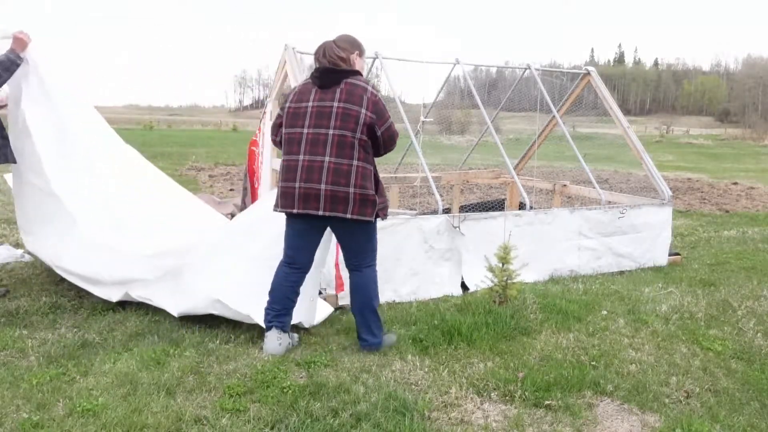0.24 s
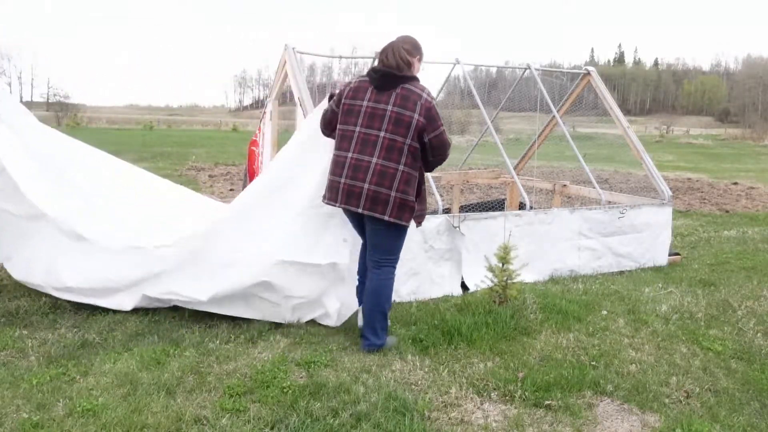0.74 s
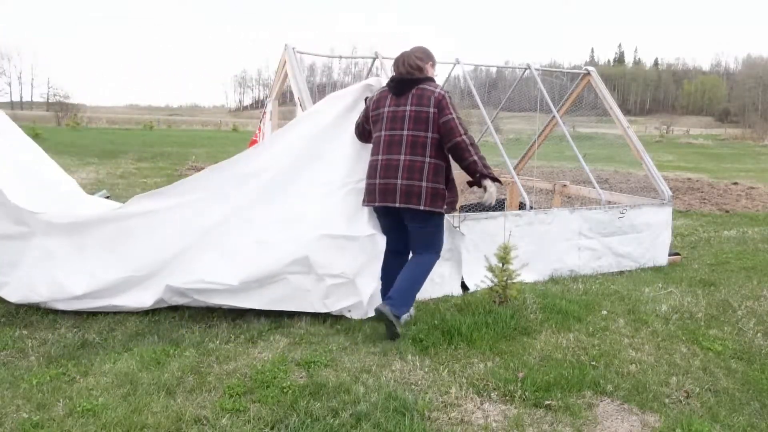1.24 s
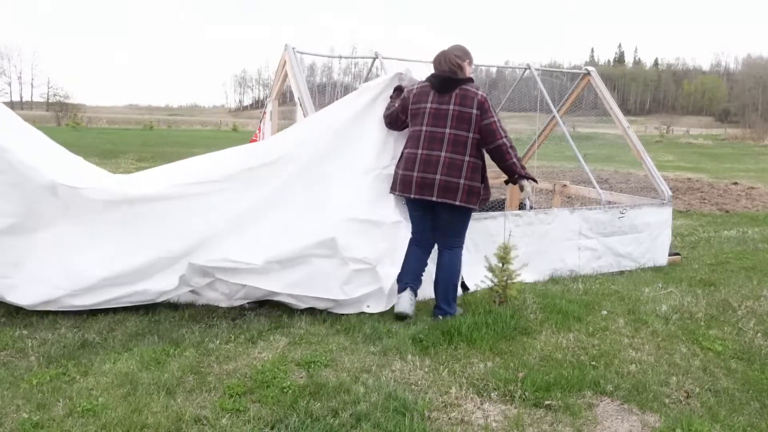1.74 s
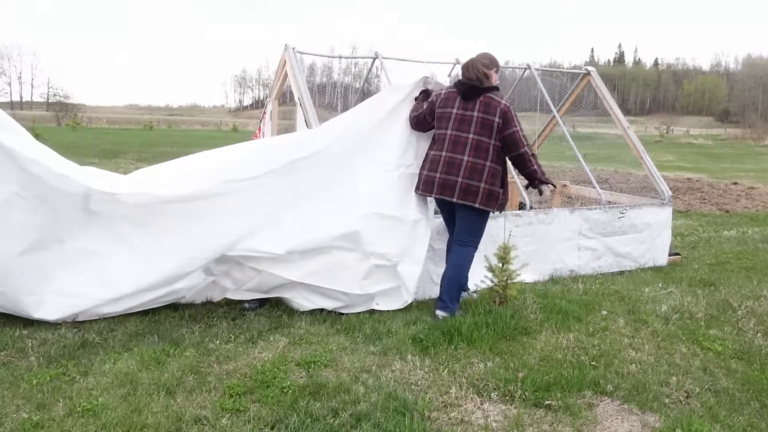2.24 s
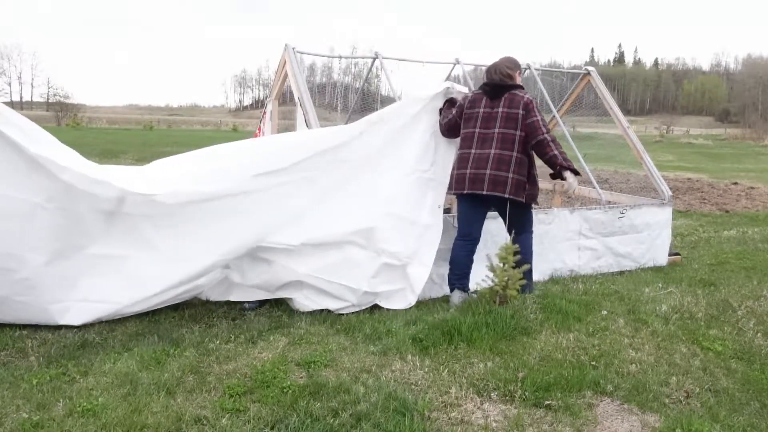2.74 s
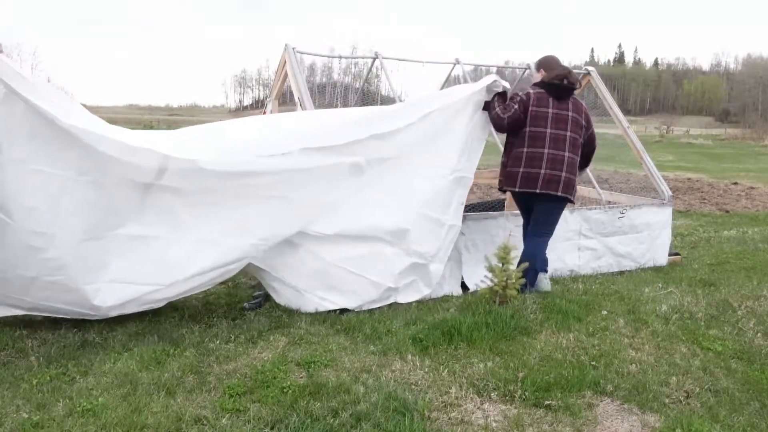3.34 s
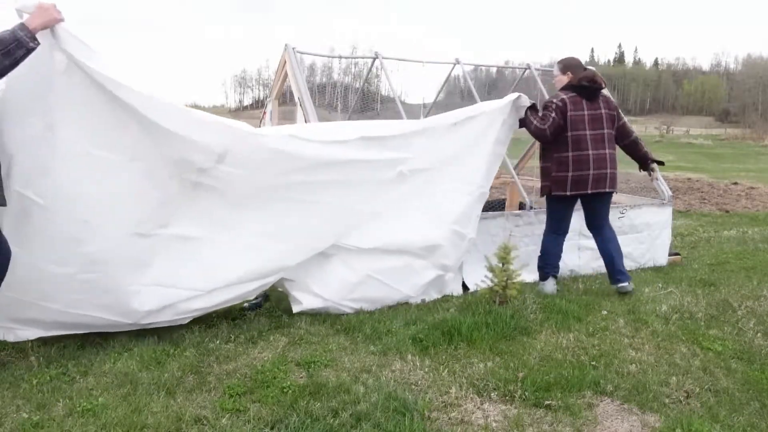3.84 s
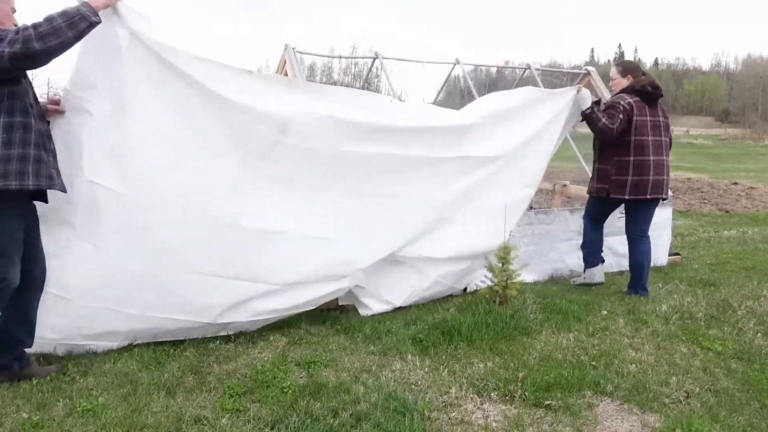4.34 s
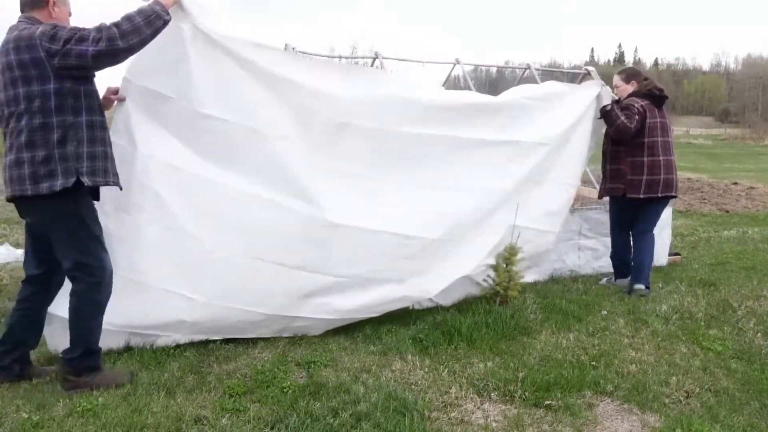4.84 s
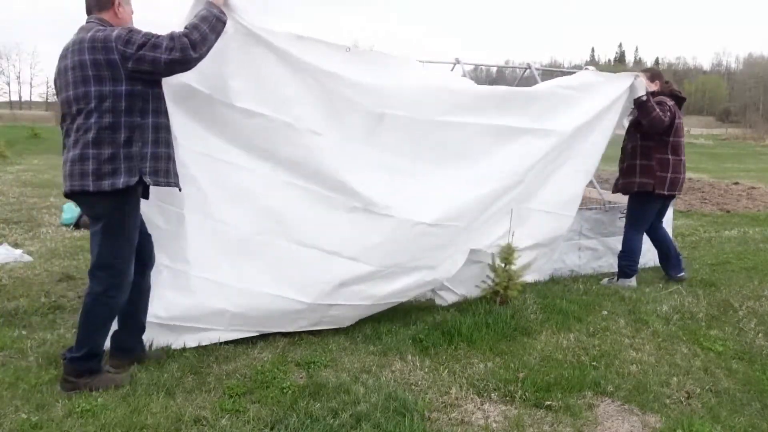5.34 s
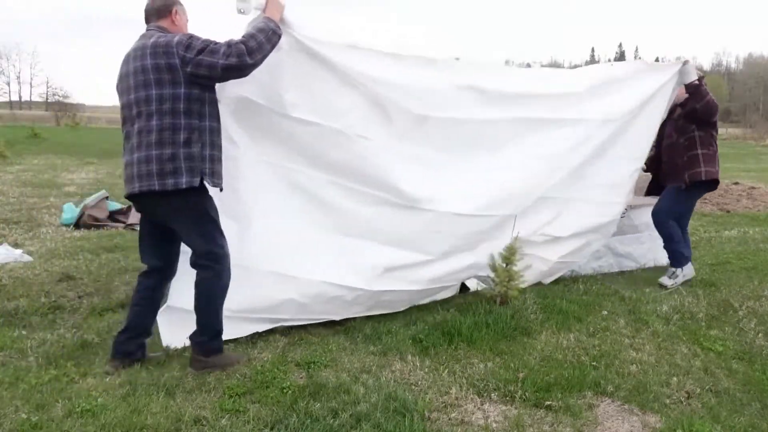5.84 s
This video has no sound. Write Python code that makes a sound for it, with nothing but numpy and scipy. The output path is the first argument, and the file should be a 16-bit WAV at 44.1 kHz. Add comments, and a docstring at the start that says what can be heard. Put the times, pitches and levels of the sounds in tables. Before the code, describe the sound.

A large plastic tarp rustles, snaps and crinkles in uneven swells as it is hauled across grass and a frame outdoors.

```python
"""Open field, a few metres from a camera: two people pull a large plastic tarp over a greenhouse frame.
A hard tug opens with a rush of snaps; lighter handling follows, then new flurries near 1.2 s and from 2.3 s.
After a lull past 3.3 s the pulls are hardest from 4.3 to 5.4 s, then they thin out to the end.
Throughout, folds rumble as soft noisy grains, creases crinkle in swarms of short filtered noise bursts,
and the sliding sheet hisses as shaped noise with ticks; the noise drifts from slightly left to slightly right."""
import sys
import numpy as np
from scipy import signal
from scipy.fft import rfft, irfft, next_fast_len
from scipy.io import wavfile
from scipy.ndimage import uniform_filter1d, map_coordinates

SR = 44100
rng = np.random.default_rng(int(sys.argv[2]) if len(sys.argv) > 2 else 0)


def wrap_up_sound(samples):
    """Save the sound to the file named by the first command line argument, as 16-bit audio."""
    columns = np.atleast_2d(samples).T
    # keep every value between -1 and 1, then stretch to whole-number steps
    tamed = np.clip(columns, -1, 1)
    steps = np.round(tamed * 32767).astype(np.int16)
    wavfile.write(sys.argv[1], SR, steps)


N = 268561  # length in samples, about 6.1 s

# big creases popping through: start_s [s], energy_db [dB], centre_hz [Hz], tail_db [dB against the front]
BIG_SNAPS = [(0.002, 0, 1450, 15), (0.027, 0, 1795, 18), (0.0301, -1, 4530, 6.5), (0.042, -5, 2780, 9),
             (0.0527, -2, 1695, 4), (0.066, 0.5, 1966, 1.5), (0.103, -6, 3728, -3), (0.151, -2.5, 1783, 8),
             (0.2222, -3.5, 5370, 0), (0.3623, -4, 2700, -4), (0.3867, -8.5, 2470, 7),
             (0.4076, -8, 4300, -2.5), (0.4569, -8.5, 1650, 4.5), (0.5694, -7.5, 1940, 5),
             (0.5813, -8, 2720, 2), (0.6627, -7.5, 3760, -1.5), (0.6848, -1, 3170, -2),
             (0.823, -6, 620, -19), (0.946, -4, 2110, 8), (1.016, -6, 1000, -3), (1.036, -3, 2300, 11),
             (1.1386, 0, 2590, 13), (1.1757, -2.5, 1830, 3), (1.2037, -5, 3000, 0), (1.2415, -3, 1850, 7),
             (1.261, -3, 2620, 7), (1.2895, -5.5, 3750, 4), (1.29, 0.5, 890, -6), (1.335, -3, 2150, 5),
             (1.3981, -1.5, 1450, 1), (1.398, -3, 4400, -4), (1.434, -10, 3260, -5), (1.461, -5, 1740, 6),
             (1.5614, -10.5, 4160, 4), (1.6076, -6, 1530, 1), (1.677, -3.5, 1900, -20),
             (1.776, -5.5, 3000, 13), (1.892, -4, 2780, 20), (1.9272, -8, 3460, 0), (1.947, -6, 1860, -2),
             (1.9978, -8.5, 1950, 15), (2.038, -9.5, 2520, 0), (2.1833, -2, 1900, 0), (2.187, -3, 2620, 3),
             (2.199, -5, 2170, 13), (2.2281, -8, 1450, 13), (2.3047, -6.5, 2520, 14),
             (2.3219, -5.5, 1370, -14), (2.3284, -2, 2000, 9), (2.3494, 3, 1400, 4.5), (2.4893, 2, 1590, 4),
             (2.5, -3, 2200, 12), (2.54, -7, 4600, 19), (2.557, -3.5, 1750, 5), (2.5823, -4, 2350, 13),
             (2.633, -4.5, 3100, 20), (2.663, -2, 970, 3), (2.6889, -2.5, 2800, 4), (2.693, -2, 3180, 11),
             (2.7274, 3, 1930, 7.5), (2.75, -3.5, 1600, 11), (2.759, -3.5, 1800, 9), (2.804, -6.5, 4060, 5),
             (2.822, -2, 2300, 23), (2.848, -0.5, 2900, 6), (2.9437, -5.5, 3400, 14),
             (3.002, -5.5, 1660, 7), (3.1057, -3, 2060, 6), (3.13, -1.5, 5300, -11), (3.141, 1, 1400, 4),
             (3.1843, -1.5, 2840, 3), (3.212, -3, 2700, 12), (3.2246, -3, 1740, 7), (3.2921, -6, 1730, 9),
             (3.3639, -7.5, 1500, 6), (3.4399, -11.5, 2300, 19), (3.5472, -8.5, 3160, 5),
             (3.655, -6.5, 2160, 3), (3.6949, -7, 2880, 4), (3.7384, -7.5, 1820, 3),
             (3.8375, -3.5, 1500, 2), (3.8848, 2.5, 3340, -7), (3.9153, -7.5, 1590, 6),
             (4.1088, -4.5, 1810, 11), (4.132, -4, 1640, -1), (4.1945, -3, 2750, 4), (4.25, -3.5, 2370, 1),
             (4.2782, -1.5, 1650, -3), (4.3079, -5.5, 4210, 11), (4.4246, 1.5, 1700, 2.5),
             (4.4845, 5, 2400, 11), (4.5012, -2.5, 756, -15), (4.5358, 0.5, 4600, 4), (4.588, -2, 3500, -1),
             (4.6241, -2.5, 1670, 0), (4.718, -0.5, 4200, -2), (4.826, 0.5, 2720, -2),
             (4.832, -2.5, 2280, 14), (4.845, 3.5, 2500, 6), (4.8611, -3.5, 3320, 6),
             (4.8864, -1.5, 4400, 7), (4.9096, -3.5, 1780, 11), (4.951, -3, 2190, 1), (5.023, 0.5, 3080, 6),
             (5.04, -2, 2060, 14), (5.1083, -3.5, 2000, 0), (5.263, -4, 2620, 4.5),
             (5.2999, -2.5, 2550, 0.5), (5.3206, -3.5, 1710, 9), (5.354, -5, 3295, 6), (5.374, 0, 2520, -4),
             (5.4997, 0, 2010, -13.5), (5.5168, -5.5, 1630, 3.5), (5.5845, -5.5, 2620, 1),
             (5.6294, -6, 1080, -1.5), (5.6404, -8, 2900, -7), (5.7864, -3, 3830, 9), (5.831, -8, 2350, 4),
             (5.8851, -6.5, 2130, 4), (6.022, -4.5, 2658, -0.5)]
# colour of flexing folds, small creases and sliding weave: pitch_hz [Hz], relative level_db [dB per Hz]
FOLD_COLOUR = [(20, -46), (70, -56), (120, -30), (250, -16), (400, -9), (600, -0.5), (900, 1.5),
               (1400, -0.5), (2500, -4), (6000, -34)]
CREASE_COLOUR = [(100, -27), (400, -23), (900, -0.5), (1500, -0.5), (2200, -5), (3200, -3.5), (5000, -6.5),
                 (8000, -15.5), (12000, -29), (16000, -60)]
SLIDE_COLOUR = [(300, -33.5), (1500, -4), (4000, -2), (7000, -6.5), (10000, -16), (13000, -22.5),
                (16000, -41)]
# width of the sheet between the microphone ports: pitch_hz [Hz], side_db [dB against mid]
PORT_WIDTH = [(100, -15), (500, -19.5), (2000, -19), (4000, -16), (8000, -13), (13000, -10.5)]
# balance of the sheet across the ports: time_s [s], left_minus_right_db [dB]
SHEET_PLACE = [(0, .9), (1.3, .5), (2.2, 0), (4.2, -.2), (5.2, -1.1), (6.1, -1.5)]
# pulls on the sheet, before the gains below: peak_s [s], length_s [s], crinkle_db [dB],
# fold_db [dB against the crinkling]
SHEET_PULLS = [(.015, .11, -27, -8.5), (.155, .05, -35, -6), (.25, .14, -44.5, -1), (.51, .07, -45, -3),
               (.625, .07, -37.5, -7), (0.791, .17, -34.5, -6), (1.161, .22, -33, -5),
               (1.33, .08, -41, 0.5), (1.68, .32, -43.5, -1), (1.961, .16, -44.5, 0), (2.14, .09, -54, 7),
               (2.338, .04, -34.5, -8), (2.42, .08, -41.5, -1), (2.531, .1, -35, -6),
               (2.66, .08, -36, -4.5), (2.779, .1, -38, -3), (2.965, .14, -38.5, -3.5),
               (3.135, .07, -37.5, -7), (3.215, .09, -32.5, -6.5), (3.8, .24, -44.5, -4),
               (4.11, .13, -42, -4), (4.339, .22, -32, -8), (4.511, .08, -38, 1), (4.715, .16, -30.5, -5),
               (4.879, .11, -32, -5), (5.101, .22, -34.5, -7.5), (5.305, .11, -30.5, -10),
               (5.48, .25, -36.5, -6), (6.02, .35, -39, -8)]
# stretches of sliding, before the gain in slide(): start_s [s], end_s [s], hiss_db [dB]
SHEET_DRAGS = [(0.01, 0.038, -52), (0.153, 0.175, -44.5), (0.687, 1.57, -52), (1.878, 2.018, -56),
               (2.474, 2.721, -51.5), (2.713, 3.718, -55.5), (2.893, 2.963, -51.5), (3.738, 4.919, -50.5),
               (4.29, 4.479, -51), (5.185, 6.116, -50), (5.28, 5.341, -44.5), (5.787, 5.831, -45.5)]

TOP_HZ = 15800  # band limit of the camera
REST_CRINKLE_DB, REST_FOLD_DB = -44.5, -49.5  # the hanging sheet never lies quite still; before the gains
FOLD_GAIN_DB, CRINKLE_GAIN_DB = 4.5, -0.63  # how strongly each radiates
DRAG_EDGE_S, REST_SLIDE_DB = .02, -57  # time to start or stop sliding; hem brushing the grass, before gain
RING_Q, RING_LOSS = 2.2, 0.79  # sharpness of a crease's ring; dB of Q lost per dB scattered into the tail
AFTERMATH_DB, AFTERMATH_S = -41, .013  # crinkle power set off by a 0 dB snap; time for it to fall to 1/e
BILLOW_HZ, BILLOW_GROWS = 400, 0.13  # wide folds sound below this; extra dB there per dB of harder pulling
PANEL_HZ, PANEL_Q, PANEL_DB = 1000, 0.87, -3  # sheet around a big crease: pitch, sharpness, level against it


def snaps():
    """Big creases pop through as the sheet is tugged: taut ones ring, crumpled ones scatter into a tail."""
    start_s, energy_db, centre_hz, tail_db = np.transpose(BIG_SNAPS)
    q = RING_Q * amp(-RING_LOSS * tail_db)
    rows = buckles(centre_hz, tail_db, q, t60=.028, late_db=-19, late_t60=.07,
                   edge_hz=7400, low_hz=420, size=2048, panel_gain=amp(PANEL_DB))
    return placed(np.round(start_s * SR), rows * amp(energy_db)[:, None])


def buckles(centre_hz, tail_db, q, t60, late_db, late_t60, edge_hz, low_hz, size, panel_gain=0):
    """One row per crease: a sharp front, then bending waves that scatter through the sheet."""
    t = np.arange(size) / SR
    hz = np.fft.rfftfreq(size, 1 / SR)
    # small facets ring higher, taut ones longer
    s = 1j * hz / centre_hz[:, None]
    facet = s / (1 + s / np.maximum(q, .5)[:, None] + s * s)
    # the sheet around the crease recoils the other way
    p = 1j * hz / PANEL_HZ
    panel = panel_gain * p / (1 + p / PANEL_Q + p * p)
    # the flip takes a finite time
    edge = 1j * hz / edge_hz
    flip = 1 / (1 + np.sqrt(2) * edge + edge * edge) ** 2
    # a thin sheet radiates little bass
    low = 1j * hz / low_hz
    radiated = (facet - panel) * flip * low / (1 + low)

    # the crease gives way in a rush of tiny pops
    shape = (len(centre_hz), size)
    pops = .22 * rng.standard_normal(shape) * amp(-60 * t / .004)
    pops = pops + (t == 0)
    front = unit_energy(irfft(rfft(pops) * radiated, size))
    # the scattered waves die in an early and a late decay
    fade = amp(-60 * t / t60) + amp(late_db - 60 * t / late_t60)
    waves = rng.standard_normal(shape) * fade
    tail = unit_energy(irfft(rfft(waves) * radiated, size))
    return unit_energy(front + amp(tail_db)[:, None] * tail)


def crinkles(level_db, burst_db):
    """Small creases buckle in clumps, over a rustle of ones too fine to tell apart."""
    ticks = swarm(level_db, centre_hz=2800, scatter=1.0, spread_db=13.5, tail_db=1,
                  edge_hz=10000, count=1800)
    rustle = coloured(rng.standard_normal(N), CREASE_COLOUR)
    grain = coloured(ticks, CREASE_COLOUR) + amp(-10) * rustle
    return amp(level_db + 0.47 + burst_db) * unit(grain)


def swarm(level_db, centre_hz, scatter, spread_db, tail_db, edge_hz, count):
    """Many small buckles of unequal size, denser where the sheet moves more; rms 1."""
    density = unit(amp(level_db / 2))
    when, pitch, size, taut, blur = rng.random((count, 5)).T
    # jittered turns, spread through time in proportion to the density
    turns = (np.arange(count) + 2 * when) / (count + 2)
    starts = np.searchsorted(np.cumsum(density) / density.sum(), turns)
    hz = centre_hz * np.exp(scatter * (2 * pitch - 1))
    tails = tail_db + 10 * (blur - .5)
    q = 0.66 + 4 * taut ** 2
    rows = buckles(hz, tails, q, t60=.02, late_db=-26, late_t60=.05,
                   edge_hz=edge_hz, low_hz=400, size=640)
    sizes = amp(spread_db * size ** 2)  # most are tiny; a few stand out
    track = placed(starts, rows * sizes[:, None])
    return unit(track / np.sqrt(density))  # evens out the level; the caller sets it


def avalanches(rate, life, depth_db):
    """One crease sets off its neighbours: quick rises of activity that die away, in dB about zero."""
    chance, size = rng.random((2, N))
    kicks = (chance < rate / SR) * (1 + 2 * size)
    activity = dying(kicks, life)
    swell = np.tanh(activity / 3)  # only so many creases are ready to go
    for _ in range(2):
        swell = uniform_filter1d(swell, size=48)  # it takes a moment to spread
    return depth_db * unit(swell - swell.mean())


def aftermath():
    """Power of the crinkling that follows each big snap as the creases around it settle."""
    start_s, energy_db, _, _ = np.transpose(BIG_SNAPS)
    power = amp(energy_db + AFTERMATH_DB) ** 2
    kicks = np.bincount(np.round(start_s * SR).astype(int), power, N)
    return dying(kicks, AFTERMATH_S)


def pulled(peak_s, length_s, level_db, rest_db):
    """Level in dB of a resting rustle plus swells, each at half power half a length from its peak."""
    t = np.arange(N) / SR
    power = amp(rest_db) ** 2
    for peak, length, db in zip(peak_s, length_s, level_db):
        power = power + amp(db) ** 2 * .5 ** ((2 * (t - peak) / length) ** 2)
    return to_db(power)


def folds(level_db, burst_db):
    """Wide folds flex and bump: dull, soft grains that run together and deepen in a hard pull."""
    bumps = swarm(level_db, centre_hz=733, scatter=0.82, spread_db=8, tail_db=1,
                  edge_hz=4200, count=1600)
    rumble = coloured(rng.standard_normal(N), FOLD_COLOUR)
    grain = unit(coloured(bumps, FOLD_COLOUR) + amp(1.0) * rumble)
    billow = filtered(grain, lambda hz: 1 / (1 + (hz / BILLOW_HZ) ** 4))
    billow_gain = amp(BILLOW_GROWS * (level_db - level_db.mean()))
    grain = grain - billow + billow * billow_gain
    return amp(level_db + 1.5 + 0.5 * burst_db) * grain


def slide(level_db):
    """The weave rubs over grass and poles with a fine hiss, catching in little bursts of tiny ticks."""
    catches = swarm(level_db, centre_hz=5600, scatter=.5, spread_db=20, tail_db=0,
                    edge_hz=12000, count=500)
    hiss = coloured(rng.standard_normal(N), SLIDE_COLOUR)
    flutter_db = avalanches(rate=70, life=.008, depth_db=.6)
    return amp(level_db + 9.0 + flutter_db) * unit(hiss + amp(-12) * catches)


def dragged():
    """Level in dB of the sliding: each drag starts quickly, holds and stops."""
    t = np.arange(N) / SR

    def step(s):
        return .5 + .5 * np.tanh((t - s) / DRAG_EDGE_S)

    power = amp(REST_SLIDE_DB) ** 2
    for start_s, end_s, hiss_db in SHEET_DRAGS:
        power = power + amp(hiss_db) ** 2 * step(start_s) * (1 - step(end_s))
    return to_db(power)


def ports(x):
    """The wide sheet reaches the two microphone ports by slightly different, shifting paths."""
    t = np.arange(SR // 200) / SR
    paths = unit_energy(rng.standard_normal((6, len(t))) * amp(-60 * t / .008))
    shares = np.array([wobble(25) for _ in paths])
    arrivals = signal.fftconvolve(x[None], paths, axes=1)[:, :N]
    side = (arrivals * shares).sum(0) / np.linalg.norm(shares, axis=0)
    side = filtered(side, lambda hz: amp(along(PORT_WIDTH, hz)))
    time_s, balance_db = np.transpose(SHEET_PLACE)
    pan_db = np.interp(np.arange(N) / SR, time_s, balance_db)
    left = (x + side) * amp(pan_db / 2)
    right = (x - side) * amp(-pan_db / 2)
    return np.array([left, right])


def amp(db):
    """Decibels to gain."""
    return 10 ** (np.asarray(db) / 20)


def to_db(power):
    """Power to decibels."""
    return 10 * np.log10(power)


def unit(x):
    """Scale to rms 1."""
    return x / np.sqrt(np.mean(x ** 2) + 1e-20)


def unit_energy(rows):
    """Scale each row to energy 1."""
    return rows / np.linalg.norm(rows, axis=-1, keepdims=True)


def along(points, hz):
    """Read (pitch_hz, value) points on a log frequency axis."""
    f, v = np.transpose(points)
    return np.interp(np.log(hz + 1), np.log(f + 1), v)


def wobble(rate):
    """A smooth random curve, rate knots a second."""
    knots = rng.standard_normal(4096)
    return map_coordinates(knots, [np.arange(N) * rate / SR], mode="wrap")


def dying(kicks, life_s):
    """Let each kick decay exponentially, to 1/e in life_s."""
    return signal.lfilter([1], [1, -np.exp(-1 / (life_s * SR))], kicks)


def filtered(x, response):
    """Multiply the spectrum by a response of frequency."""
    m = next_fast_len(N + SR // 4)
    return irfft(rfft(x, m) * response(np.fft.rfftfreq(m, 1 / SR)), m)[..., :N]


def coloured(x, spectrum):
    """Filter x by a table of levels over frequency and scale to rms 1."""
    return unit(filtered(x, lambda hz: amp(along(spectrum, hz))))


def placed(starts, rows):
    """Sum rows into one track at their start samples."""
    index = np.maximum(starts, 0).astype(int)[:, None] + np.arange(rows.shape[1])
    return np.bincount(index.ravel(), rows.ravel(), N)[:N]


def scene():
    """The tarp in the open air: every pull flexes the folds and sets the creases crinkling."""
    peak_s, length_s, pull_db, weight_db = np.transpose(SHEET_PULLS)
    crinkle_db = pulled(peak_s, length_s, pull_db, REST_CRINKLE_DB) + CRINKLE_GAIN_DB
    crinkle_db = to_db(amp(crinkle_db) ** 2 + aftermath())
    fold_db = pulled(peak_s, length_s, pull_db + weight_db, REST_FOLD_DB) + FOLD_GAIN_DB
    overlap = unit(amp(crinkle_db / 2))  # in a strong pull the bursts run into each other
    burst_db = avalanches(rate=60, life=.009, depth_db=1.5) / overlap
    sheet = snaps() + crinkles(crinkle_db, burst_db) + folds(fold_db, burst_db)
    return ports(sheet + slide(dragged()))


def record(dry):
    """The camera keeps nothing above its band limit."""
    return filtered(dry, lambda hz: hz < TOP_HZ)


dry = scene()
out = record(dry)
wrap_up_sound(out)
```